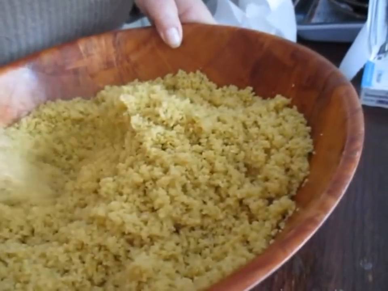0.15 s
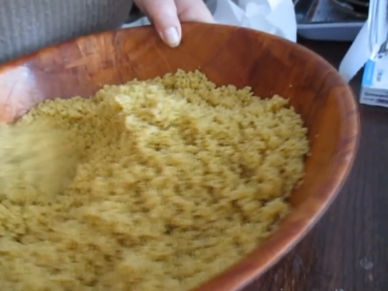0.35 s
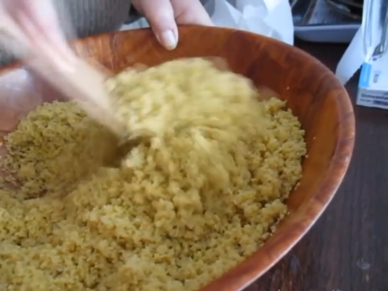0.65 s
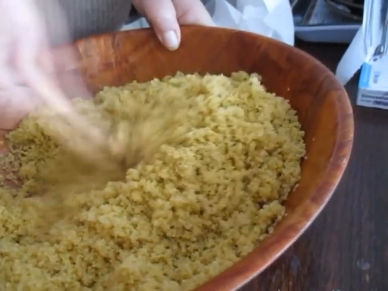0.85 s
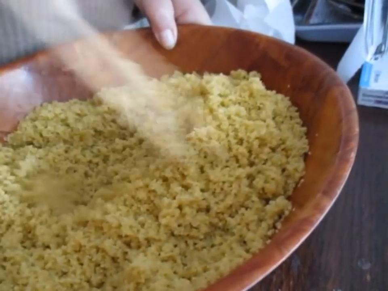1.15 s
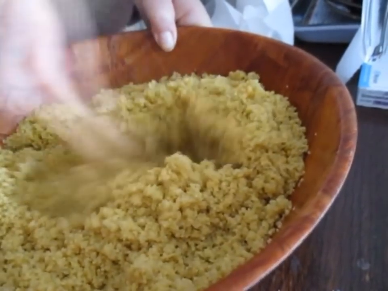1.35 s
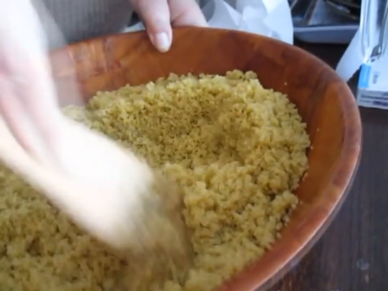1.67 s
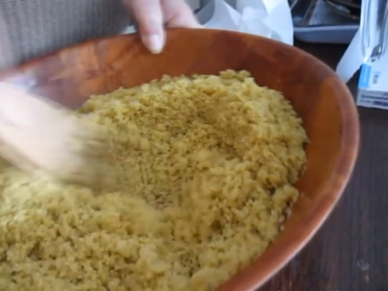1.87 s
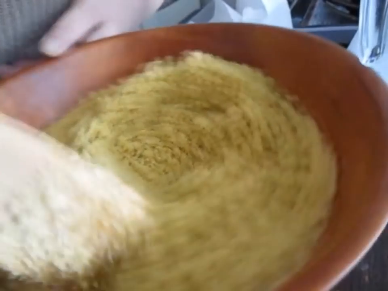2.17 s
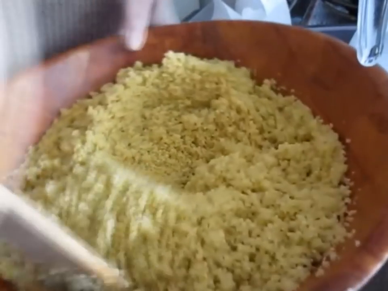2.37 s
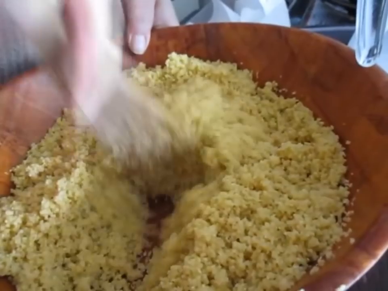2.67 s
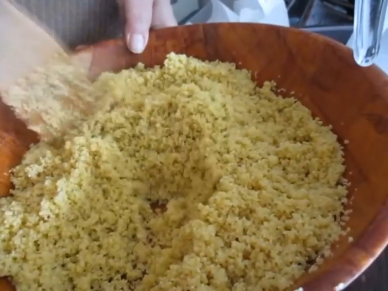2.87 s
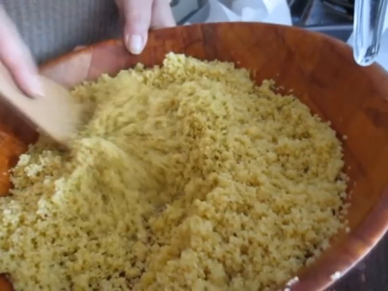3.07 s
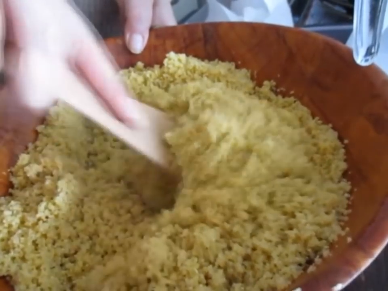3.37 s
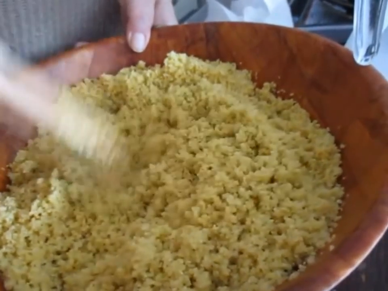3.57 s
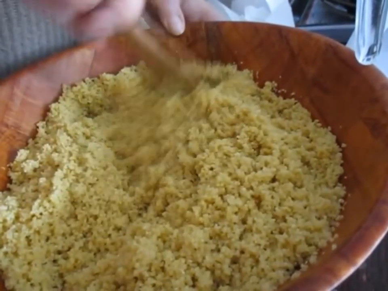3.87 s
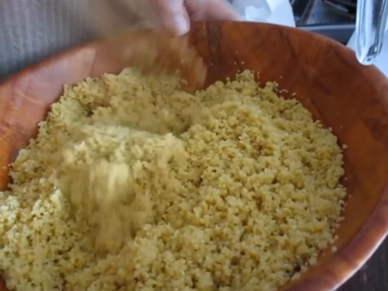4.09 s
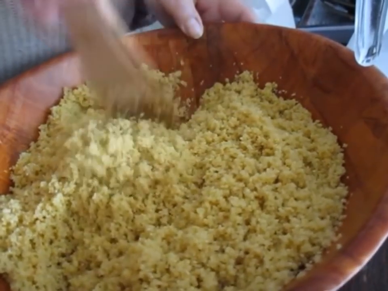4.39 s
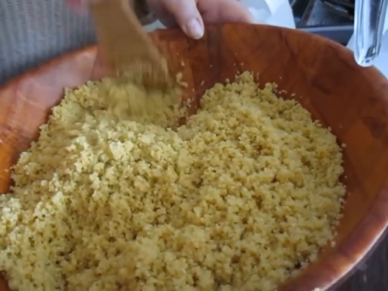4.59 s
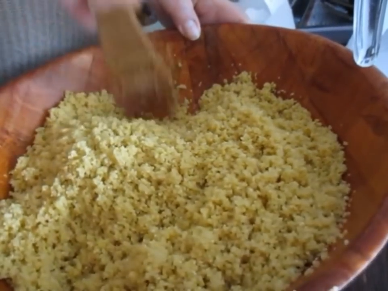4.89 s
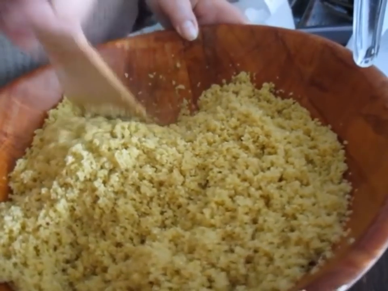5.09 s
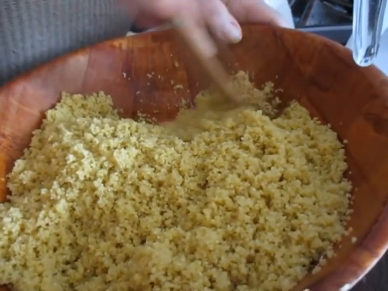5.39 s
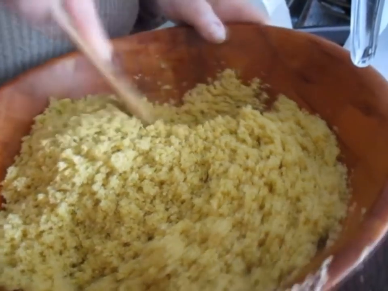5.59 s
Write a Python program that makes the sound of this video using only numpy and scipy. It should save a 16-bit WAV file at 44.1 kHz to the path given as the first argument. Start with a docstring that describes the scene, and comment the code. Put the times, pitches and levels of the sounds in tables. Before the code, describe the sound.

Close mono pickup in a small quiet kitchen. A wooden spoon pushes through couscous in a wooden bowl, each stroke a short grainy rustle and crunch. Knocks are sparse at first, then thicker strokes and firm thuds follow after three seconds, ending in hard chopping clacks with juddering scrapes. Faint hiss and low rumble stay underneath; a barely audible thin whistle glides far off near the end.

```python
"""A kitchen table in a small room: a wooden spoon stirs and fluffs couscous in a wooden bowl, close, in mono.
Each push is random grain contacts: loose grains rustle, pressed ones crunch, the spoon drags on the wood.
Damped pulses make knocks and juddering slips, hardest in the last chopping strokes; bowl and room answer.
Noise through resonances makes cracking grains and gritty bites of the spoon's edge.
Behind lie a steady faint hiss over a low rumble and a thin, distant gliding whistle."""
import sys
import numpy as np
from scipy import signal
from scipy.fft import rfft, irfft, next_fast_len
from scipy.io import wavfile
from scipy.ndimage import uniform_filter1d, map_coordinates

SR = 44100
rng = np.random.default_rng(int(sys.argv[2]) if len(sys.argv) > 2 else 0)


def store_wav(level_fs):
    """Save 16-bit WAV to argv[1]."""
    pcm = np.round(np.clip(np.atleast_2d(level_fs), -1, 1) * 32767)
    wavfile.write(sys.argv[1], SR, pcm.T.astype(np.int16))


N = 253134  # length in samples

# quiet kitchen, relative spectrum: pitch_hz, level_db
KITCHEN_SPECTRUM = [(12, -17), (25, 9), (35, -11), (48, -20.5), (80, -23.5), (160, -14), (300, -25),
                    (450, -16.5), (800, -31), (1600, -21.5), (3200, -31.5), (6200, -32), (10000, -40.5),
                    (16000, -51)]
# the room's decay: pitch_hz, t60_s
ROOM_DECAY = [(100, 0.66), (800, 0.43), (4000, 0.1), (14000, 0.16)]
# faint thin notes far off: start_s, length_s, first_pitch_hz, last_pitch_hz, level_db (peak)
WHISTLE_NOTES = [(4.836, 0.07, 5150, 4620, -55), (5.15, 0.14, 4840, 5180, -58),
                 (5.24, 0.092, 5850, 5650, -57), (5.325, 0.038, 5040, 4660, -54.5)]
# hard grains crack under the spoon or land on the bowl: start_s, level_db (relative peak), pitch_hz
GRAIN_CRACKS = [(0.3594, -29, 5000), (0.8134, -39, 4230), (0.875, -19, 3300), (1.121, -41, 3610),
                (1.258, -40, 4800), (1.5331, -27, 7120), (2.129, -26.5, 8000), (2.223, -14, 3180),
                (2.3773, -15.5, 4260), (2.666, -23, 4910), (2.691, -24, 8000), (2.7298, -28, 4060),
                (2.774, -27, 5730), (2.803, -28.5, 4670), (4.6262, -29.5, 6490), (4.6467, -14.5, 3700),
                (4.9608, -27.5, 5910), (4.9807, -26, 4270), (4.994, -14.5, 3160)]
# the spoon's edge bites into packed grain: start_s, length_s, level_db (before the fades), pitch_hz
EDGE_BITES = [(0.359, 0.028, -34, 3560), (0.363, 0.045, -34.5, 5750), (0.481, 0.021, -36, 2110),
              (1.008, 0.019, -31.5, 1950), (1.372, 0.029, -33.5, 6360), (2.425, 0.046, -37, 4300),
              (2.565, 0.031, -34, 3530), (3.07, 0.025, -33, 4900), (3.239, 0.034, -33.5, 1530),
              (3.906, 0.063, -30, 4900), (4.305, 0.047, -29, 6850), (4.38, 0.031, -30, 4000),
              (5.019, 0.014, -29, 5400), (5.414, 0.022, -40, 4100)]
# the spoon's edge sticks and slips on the wood: start_s, length_s, level_db (rms over the length), pitch_hz
STICK_SLIPS = [(0.481, 0.022, -37, 666), (0.878, 0.01, -30.5, 430), (1.007, 0.022, -43.5, 1200),
               (1.757, 0.029, -32.5, 686), (2.096, 0.11, -44.5, 850), (2.231, 0.053, -37.5, 310),
               (2.414, .055, -35, 890), (2.588, 0.031, -33.5, 615), (3.241, 0.028, -28.5, 820),
               (3.503, 0.044, -28, 745), (4.3, 0.05, -20.5, 793), (4.654, 0.036, -29, 890),
               (4.715, 0.018, -20.5, 767), (5.019, 0.011, -18.5, 780), (5.404, 0.068, -41, 655)]
# spoon meets bowl, relative levels: start_s, clack_level_db, clack_pitch_hz, clack_swell_s, thud_level_db
SPOON_KNOCKS = [ (0.36, -34.5, 600, 0.00059, -40.5), (0.454, -30.5, 724, 0.0016, -29.5),
                (0.8754, -12, 770, 0.00041, -21.5), (1.006, -36, 380, 0.0032, -35),
                (1.395, -24, 690, 0.0007, -23.5), (1.629, -22.5, 830, 0.00029, -27),
                (1.7561, -3, 980, 0.00046, -18), (1.851, -25.5, 960, 0.00055, -29.5),
                (2.225, -14, 770, 0.0002, -17.5), (3.1218, -8.5, 710, 0.00053, -19),
                (3.704, -52, 613, 0.0016, -27.5), (3.9137, -20, 716, 0.00066, -43),
                (3.9178, -10.5, 664, 0.00081, -3.5), (4.1424, -31, 574, 0.0011, -25),
                (4.294, -6, 810, 0.001, -10), (4.352, -31, 600, 0.00075, -15.5),
                (4.647, 4, 1120, 0.00058, -18.5), (4.7132, -12, 900, 0.00082, -30),
                (4.777, -26, 474, .001, -19), (4.995, -0.5, 855, 0.00064, -16),
                (5.018, -3, 980, 0.002, -24.5), (5.207, -37, 540, 0.0014, -31),
                (5.396, -22, 735, 0.0019, -28), (5.458, -21.5, 600, 0.00051, -21.5)]
# modes of the bowl on its table, relative levels: pitch_hz, level_db, t60_s
BOWL_MODES = [(84.3, -2, 0.13), (102.5, -3.5, 0.22), (191, -7.5, 0.2), (228.8, 4.5, 0.093),
              (338, 9.5, 0.17), (397.3, 12, 0.14), (628, -4.5, 0.22), (789.6, 5, 0.17), (872, -8, 0.12),
              (970, -25, 0.098), (1130, 6, 0.17), (1247, -13.5, 0.12), (1404, 13, 0.072)]
# loose grains, relative spectrum: pitch_hz, level_db
RUSTLE_SPECTRUM = [(100, -31), (500, -14), (1200, -1), (2000, -33.5), (3000, -1), (4200, 0.5), (5500, -1),
                   (7000, -2), (9000, -6), (12000, -12), (15500, -24)]
# pressed grains, relative spectrum: pitch_hz, level_db
CRUNCH_SPECTRUM = [(100, -0.5), (400, -2), (800, 2.5), (1250, 7.5), (1700, 1.5), (2300, 3.5), (3100, 0.5),
                   (4500, -32.5), (9000, -36)]
# spoon dragging on wood, relative spectrum of its slips: pitch_hz, level_db
DRAG_SPECTRUM = [(30, -37), (65, -3), (95, -1), (150, 4.5), (220, 3), (350, -4), (500, -3.5), (800, -8),
                 (1250, -45), (1800, -1.5), (4000, -43)]
# pushes through the grain, levels before each layer's trim:
# start_s, rise_s, hold_s, rustle_level_db, crunch_level_db, drag_level_db
SPOON_PUSHES = [ (0.058, 0.039, 0.02, -41.5, -57, -64), (0.357, .006, 0.084, -39.5, -45.5, -66),
                (0.469, 0.019, 0.015, -41.5, -43.5, -42), (0.811, .006, 0.064, -47.5, -79, -56),
                (0.83, 0.029, 0.089, -56, -46.5, -63), (0.912, 0.067, 0.063, -42.5, -44.5, -63),
                (1.26, 0.0049, 0.025, -52, -67, -61), (1.315, 0.07, 0.017, -39, -43.5, -41.5),
                (1.399, .03, 0.069, -40.5, -42, -70), (1.714, 0.039, 0.018, -38.5, -40.5, -54),
                (1.775, 0.086, 0.026, -40.5, -41, -43), (2.005, .1, 0.11, -48, -49.5, -42.5),
                (2.212, .01, 0.059, -43.5, -42.5, -43.5), (2.264, 0.043, 0.11, -45.5, -52, -45),
                (2.392, 0.044, .085, -40.5, -43, -33.5), (2.528, 0.049, 0.029, -35.5, -32.5, -40.5),
                (2.638, 0.044, 0.038, -47.5, -50, -69), (2.965, 0.13, 0.024, -32.5, -33.5, -35),
                (3.121, 0.1, 0.046, -34.5, -31, -29), (3.27, 0.033, 0.094, -42, -40, -44),
                (3.414, 0.095, 0.032, -35, -33, -41.5), (3.705, 0.079, 0.041, -46.5, -65, -43),
                (3.862, 0.051, 0.086, -28, -35.5, -41), (4.137, 0.024, 0.018, -48, -58, -56),
                (4.282, 0.017, 0.03, -27, -35, -51), (4.364, 0.023, 0.0077, -32, -35, -38.5),
                (4.625, 0.024, 0.093, -36.5, -47, -36.5), (4.982, 0.015, 0.018, -37.5, -44.5, -48),
                (5.063, 0.0069, 0.0041, -38.5, -52, -39), (5.39, 0.011, 0.052, -39, -52.5, -35.5),
                (5.471, 0.087, 0.04, -35.5, -39.5, -57)]
# faint rustle lingering between pushes, before each layer's offset: time_s, level_db
LINGERING_RUSTLE = [(0, -64.5), (.1, -62), (.26, -92), (.6, -69), (1.1, -66), (1.25, -66.5), (1.5, -58),
                    (1.68, -62.5), (1.95, -56), (2.7, -54.5), (2.9, -54), (3.4, -45), (3.7, -52),
                    (4.2, -52), (4.8, -53.5), (4.95, -56), (5.35, -59), (5.74, -52)]
# flight of the crumbs thrown up by a push: shortest_s, longest_s
CRUMB_FLIGHT = (0.011, .11)

TOP_HZ = 16000  # upper band limit
RUSTLE_FALL_DB_PER_S, CRUNCH_FALL_DB_PER_S, DRAG_FALL_DB_PER_S = 261, 210, 181  # once a push stops
LINGER_CRUNCH_DB, LINGER_DRAG_DB = -1, 2  # offsets from the lingering rustle
PACKING_POWER = 2.75  # crunch and drag swell later than the rustle, as the grain packs
THUD_HZ, THUD_SWELL_S = 216.3, 0.0038  # the filled bowl
TABLE_HZ, TABLE_SWELL_S, TABLE_DB = 107.3, 0.014, -12.5  # the table under it, level against the thud
CRUMB_DB, CRUMB_SCATTER_DB = -1, 8  # relative peak against the push's rustle, and its spread
CRUMB_HZ, CRUMB_PITCH_SPREAD = 5330, 0.63  # typical pitch, spread of its natural log


def amp(db):
    """Decibels to gain."""
    return 10 ** (np.asarray(db) / 20)


def unit(x):
    """Scale to rms 1."""
    return x / np.sqrt(np.mean(x ** 2) + 1e-20)


def along(points, hz):
    """Read (Hz, value) points on a log frequency axis."""
    f, v = np.transpose(points)
    return np.interp(np.log(hz + 1), np.log(f + 1), v)


def add(track, s, sound):
    """Mix a sound into a track at a time in seconds."""
    start = round(s * SR)
    track[start:start + len(sound)] += sound[:len(track) - start]


def filtered(x, response):
    """Multiply the spectrum of x by a response of frequency."""
    size = next_fast_len(len(x) + 8192)
    hz = np.fft.rfftfreq(size, 1 / SR)
    return irfft(rfft(x, size) * response(hz), size)[:len(x)]


def coloured(x, spectrum):
    """Shape x by a spectrum, at rms 1."""
    return unit(filtered(x, lambda hz: amp(along(spectrum, hz))))


def softened(x, edge_hz, order):
    """Causal low-pass: the give of the materials rounds off a contact."""
    return signal.sosfilt(signal.butter(order, edge_hz, fs=SR, output="sos"), x)


def resonant(x, hz, width):
    """Pass x through one resonance; width is a share of its pitch."""
    return signal.lfilter(*signal.iirpeak(min(hz, SR / 4), 1 / width, fs=SR), x)


def wobble(rate):
    """A smooth random curve through `rate` random points a second."""
    points = rng.standard_normal(int(N * rate / SR) + 4)
    return map_coordinates(points, [np.arange(N) * rate / SR])


def room_tail(near_db, near_t60):
    """Dense early echoes off bowl and table, then the kitchen's longer decay; energy 1."""
    hz, t, z = signal.stft(rng.standard_normal(SR // 3), SR, nperseg=256)
    kitchen_fade = amp(-60 * t / along(ROOM_DECAY, hz)[:, None])
    near_fade = amp(near_db - 60 * t / near_t60)
    tail = signal.istft(z * (kitchen_fade + near_fade) * (t > 0), SR, nperseg=256)[1]
    return tail / np.linalg.norm(tail)


def bowl_ring(scatter_db):
    """The bowl's decaying modes, at new strengths for each place of contact; energy 1."""
    t = np.arange(SR // 5, dtype=np.float32) / SR
    hz, db, t60 = np.array(BOWL_MODES, dtype=np.float32).T[:, :, None]
    phase = rng.random(hz.shape, dtype=np.float32)
    strength = amp(db + scatter_db * rng.standard_normal(db.shape))
    decay = np.exp(-np.float32(np.log(1000)) * t / t60)
    ring = np.sum(strength * decay * np.sin(2 * np.pi * (hz * t + phase)), axis=0)
    return unit(ring) / np.sqrt(len(t))


def through_bowl(contact, ring_db, room_db):
    """A contact, dulled by the grain-filled wood, with the ring and echoes that it sets off."""
    answer = np.zeros(SR // 3)
    answer[0] = 1  # the contact itself
    add(answer, 0, amp(ring_db) * bowl_ring(scatter_db=0.5))
    add(answer, 0, amp(room_db) * room_tail(near_db=21, near_t60=0.027))
    return softened(signal.fftconvolve(contact, answer), edge_hz=1414, order=6)


def pulse(hz, swell):
    """A few swings of heavily damped wood, peaking near 1 after the swell time."""
    t = np.arange(SR // 16) / SR
    u = t / swell
    return -u ** 2 * np.exp(2 * (1 - u)) * np.sin(2 * np.pi * hz * t)


def grains(spectrum, rate, spread_db, clump_db, patchy_db):
    """Tiny contacts of uneven size, in clumps whose colour keeps shifting; rms 1."""
    present = rng.random(N) < rate / SR
    sign = rng.choice([-1, 1], N)
    hits = present * sign * amp(spread_db * np.minimum(rng.standard_normal(N), 2))
    z = signal.stft(hits, nperseg=512)[2]
    # smooth random gain over time and frequency
    field = uniform_filter1d(rng.standard_normal(z.shape), size=7, axis=0)
    field = uniform_filter1d(field, size=7, axis=1)
    hits = signal.istft(z * amp(patchy_db * unit(field)), nperseg=512)[1][:N]
    return coloured(hits * amp(clump_db * wobble(90)), spectrum)


def kitchen():
    """Steady faint hiss over a low rumble: noise shaped by the quiet kitchen's spectrum."""
    return amp(-58) * coloured(rng.standard_normal(N), KITCHEN_SPECTRUM)


def whistle():
    """Thin gliding sine notes with a slight quaver, perhaps a bird outside."""
    track = np.zeros(N)
    for s, length, first_hz, last_hz, db in WHISTLE_NOTES:
        u = np.linspace(0, 1, round(length * SR))
        glide = first_hz + (last_hz - first_hz) * u
        pitch = glide * (1 + 0.0036 * wobble(200)[:len(u)])
        add(track, s, amp(db) * np.sin(np.pi * u) * np.sin(2 * np.pi * np.cumsum(pitch) / SR))
    return track


def crumbs(count):
    """Crumbs land after each push: rows of start_s, level_db (relative peak), pitch_hz."""
    rows = []
    for s, rise, hold, rustle_db, *_ in SPOON_PUSHES:
        for _ in range(count):
            landing = s + rise + hold + rng.uniform(*CRUMB_FLIGHT)
            level_db = rustle_db + CRUMB_DB + CRUMB_SCATTER_DB * rng.standard_normal()
            pitch_hz = CRUMB_HZ * np.exp(CRUMB_PITCH_SPREAD * rng.standard_normal())
            rows.append((landing, level_db, pitch_hz))
    return rows


def cracks(t60, width, crumble_db, crumble_t60):
    """A hard grain snaps with a bright resonant tick and a weaker crumbling decay."""
    track = np.zeros(N)
    t = np.arange(SR // 30) / SR
    for s, db, hz in [*GRAIN_CRACKS, *crumbs(count=2)]:
        fade = amp(-60 * t / t60) + amp(crumble_db - 60 * t / crumble_t60)
        burst = rng.standard_normal(len(t)) * fade
        tick = softened(resonant(burst, hz, width), edge_hz=10600, order=2)
        add(track, s, amp(db - 0.2) * tick / np.abs(tick).max())
    echoes = signal.fftconvolve(track, room_tail(near_db=10, near_t60=0.051))[:N]
    return track + amp(-29) * echoes


def bites(width, attack, fade_db):
    """Grit scrapes past the spoon's edge in a narrow band, starting abruptly and easing off."""
    track = np.zeros(N)
    t = np.arange(SR // 6) / SR
    for s, length, db, hz in EDGE_BITES:
        noise = rng.standard_normal(len(t))
        grit = unit(resonant(resonant(noise, hz, width), hz, width))
        onset = 1 - np.exp(-t / attack)
        add(track, s, grit * onset * amp(db - fade_db * (t / length) ** 2))
    return track


def judders(slip_rate, swell_cycles, spread_db):
    """The edge sticks and slips on the wood: quick uneven slips, each a small clack."""
    track = np.zeros(N)
    for s, length, db, hz in STICK_SLIPS:
        size = round(length * SR)
        run = np.zeros(size + SR // 16)
        chance = rng.standard_normal((60, 3))  # gap, force and pitch of each slip
        times = np.cumsum(np.exp(0.35 * chance[:, 0])) / slip_rate
        for at, (_, force, pitch) in zip(times - times[0], chance):
            if at < length:
                slip = pulse(hz * np.exp(0.25 * pitch), swell_cycles / hz)
                add(run, at, amp(spread_db * force) * slip)
        run = through_bowl(run, ring_db=-14, room_db=-3.5)
        add(track, s, amp(db) * run / np.std(run[:size]))
    return track


def knocks():
    """Each blow gives a dead wooden clack, a low thud of the filled bowl and a bump of the table."""
    track = np.zeros(N)
    thud = pulse(THUD_HZ, THUD_SWELL_S) + amp(TABLE_DB) * pulse(TABLE_HZ, TABLE_SWELL_S)
    for s, clack_db, hz, swell, thud_db in SPOON_KNOCKS:
        clack = through_bowl(pulse(hz, swell), ring_db=-18, room_db=-10)
        add(track, s, amp(clack_db) * clack)
        add(track, s, amp(thud_db - 4.5) * through_bowl(thud, ring_db=-11, room_db=-4.5))
    return track


def effort(levels_db, swell_power, fall_db_per_s, linger_db):
    """Gain of one layer: every push swells, holds and dies away, over the lingering rustle."""
    t = np.arange(N) / SR
    power = amp(np.interp(t, *np.transpose(LINGERING_RUSTLE)) + linger_db) ** 2
    age = t[:SR]
    for (s, rise, hold, *_), db in zip(SPOON_PUSHES, levels_db):
        swell = np.minimum(age / rise, 1) ** swell_power
        fall_db = fall_db_per_s * np.maximum(age - rise - hold, 0)
        add(power, s, (swell * amp(db - fall_db)) ** 2)
    return np.sqrt(power)


def stirring():
    """Loose grains rustle, pressed grains crunch, and the spoon rumbles over them on the wood."""
    *_, rustle_db, crunch_db, drag_db = np.transpose(SPOON_PUSHES)
    rustle = effort(rustle_db, 1, RUSTLE_FALL_DB_PER_S, 0)
    crunch = effort(crunch_db, PACKING_POWER, CRUNCH_FALL_DB_PER_S, LINGER_CRUNCH_DB)
    drag = effort(drag_db, PACKING_POWER, DRAG_FALL_DB_PER_S, LINGER_DRAG_DB)
    loose = rustle * grains(RUSTLE_SPECTRUM, rate=7000, spread_db=3, clump_db=0.53, patchy_db=2)
    pressed = crunch * grains(CRUNCH_SPECTRUM, rate=2800, spread_db=1, clump_db=0, patchy_db=3)
    slips = grains(DRAG_SPECTRUM, rate=1000, spread_db=3, clump_db=1.16, patchy_db=5.5)
    rubbed = drag * unit(through_bowl(slips, ring_db=-13, room_db=-6.5)[:N])
    return amp(-1) * loose + pressed + amp(1) * rubbed


def scene():
    """All sources reach one close microphone, alike in both channels."""
    background = kitchen() + whistle()
    grit = cracks(t60=0.0067, width=1.16, crumble_db=-11.5, crumble_t60=0.054)
    grit += bites(width=0.4, attack=0.0028, fade_db=6)
    wood = judders(slip_rate=330, swell_cycles=0.98, spread_db=0.5) + knocks()
    mono = background + grit + wood + stirring()
    return np.array([mono, mono])


def record(dry):
    """The microphone signal clips just under full scale, then loses all above its band limit."""
    clipped = np.clip(dry, -0.95, 0.95)
    return np.array([filtered(side, lambda hz: hz < TOP_HZ) for side in clipped])


dry = scene()
out = record(dry)
store_wav(out)
```